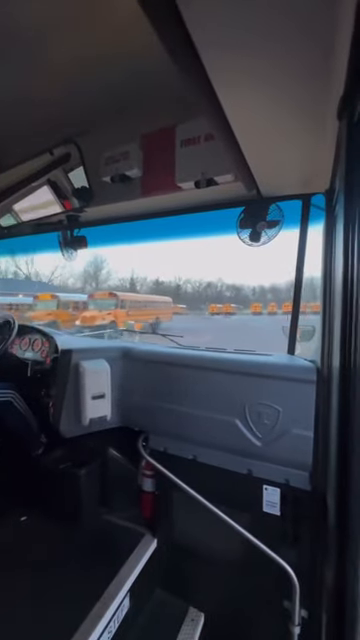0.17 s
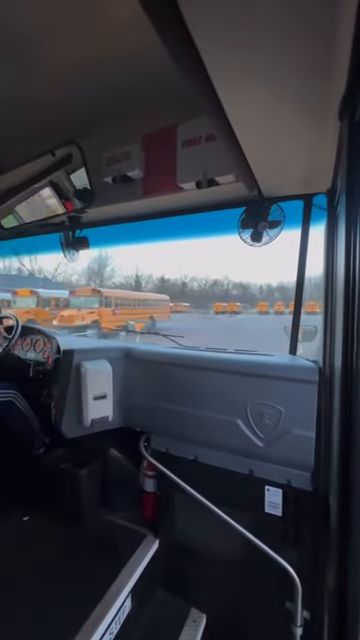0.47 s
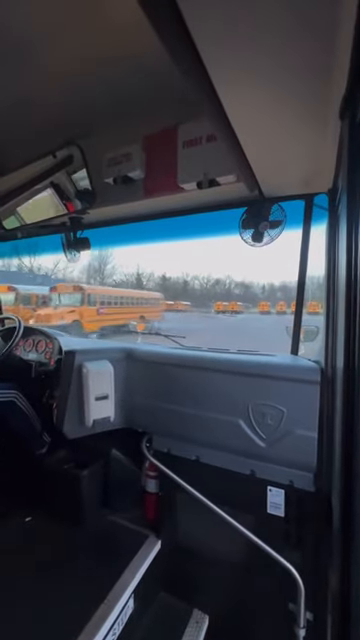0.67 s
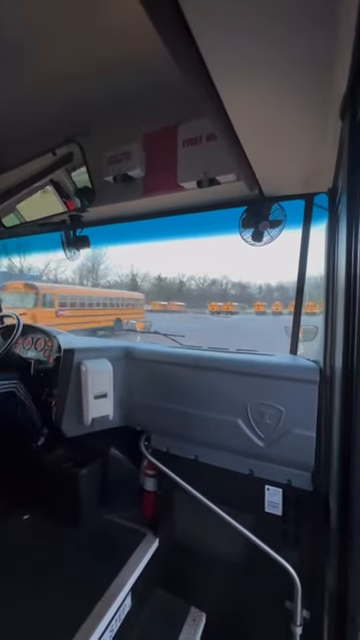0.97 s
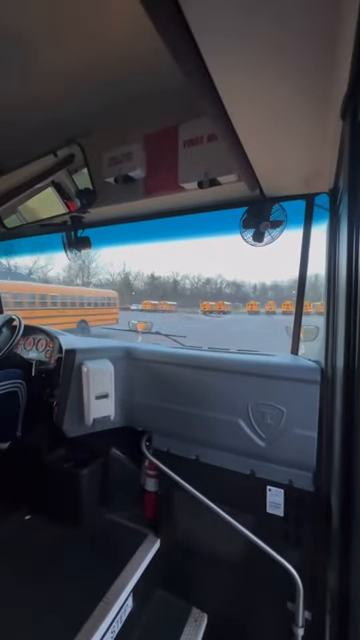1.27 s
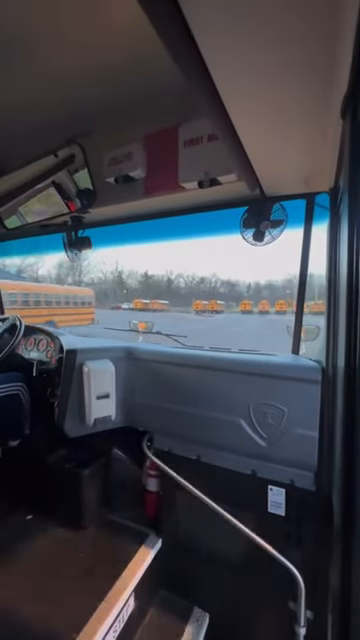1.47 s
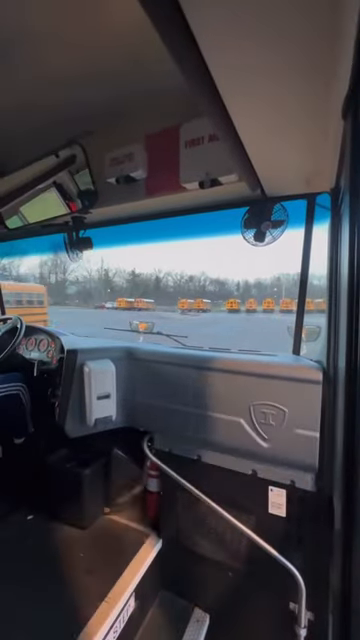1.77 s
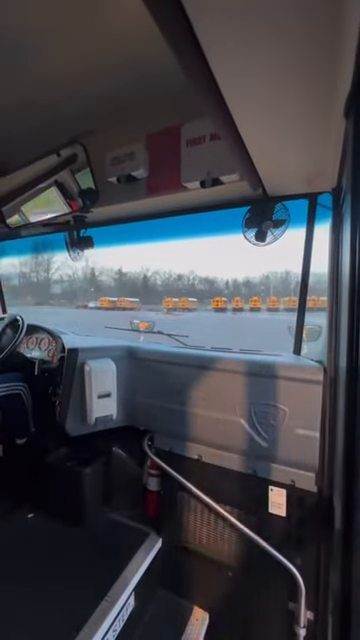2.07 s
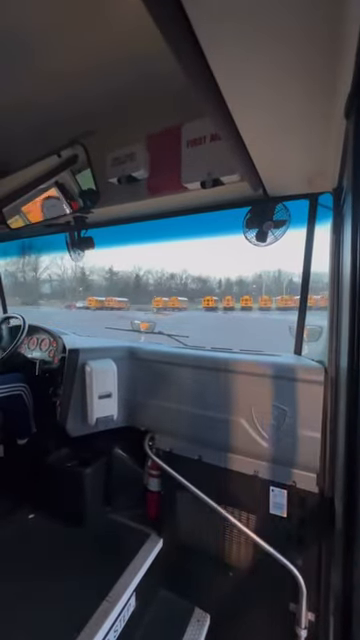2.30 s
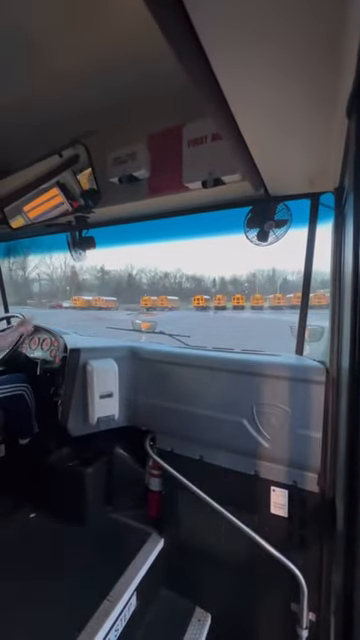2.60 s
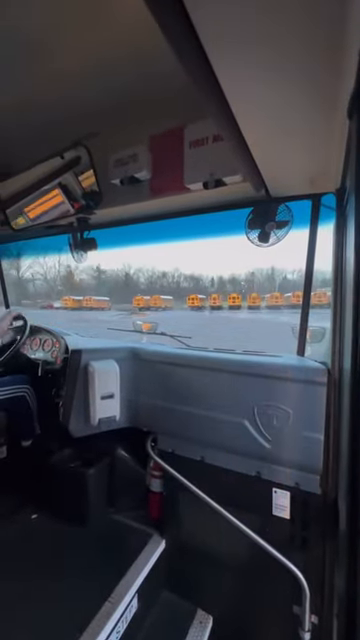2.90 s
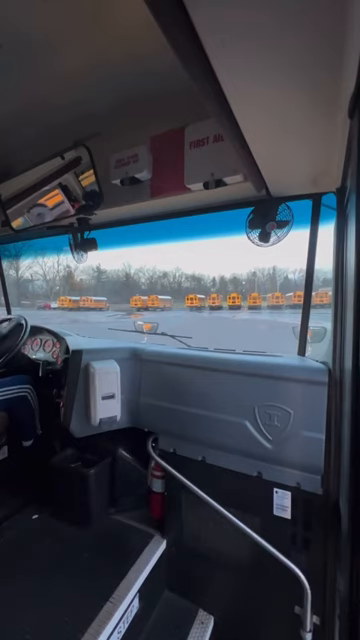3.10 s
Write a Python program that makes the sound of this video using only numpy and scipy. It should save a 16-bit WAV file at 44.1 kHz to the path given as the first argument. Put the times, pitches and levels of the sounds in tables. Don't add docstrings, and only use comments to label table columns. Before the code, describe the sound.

Inside a rolling empty bus, a diesel engine growls under load with a faint high whistle, then eases off; a breathy sigh, metallic clack and air hiss follow, then low coasting rumble and rattles, captured close in stereo.

```python
import sys
import numpy as np
from scipy import signal
from scipy.fft import rfft, irfft
from scipy.io import wavfile

SR = 44100
rng = np.random.default_rng(int(sys.argv[2]) if len(sys.argv) > 2 else 0)


def unload_wav(signal):
    wavfile.write(
        sys.argv[1],
        SR,
        np.round(np.clip(np.atleast_2d(signal).T, -1, 1) * 32767).astype(np.int16),
    )


def attenuation_scalar(level_db):
    decades = np.asarray(level_db, float) / 20
    return 10 ** decades


N = 143325

# freq_hz, density_db_per_hz
CABIN_SPECTRUM = [(150, -2.5), (320, -17.5), (700, -19), (950, -20), (1300, -31), (3500, -38),
                  (8000, -44.5), (12000, -53.5), (15800, -56)]
# time_s, level_db
ROLL_LEVEL = [(0, -34.5), (.15, -14), (.42, -31), (1.2, -27.5), (1.8, -36), (2.3, -34.5), (2.7, -29.5),
              (2.95, -23), (3.25, -33.5)]
# freq_hz, density_db_per_hz
RUMBLE_SPECTRUM = [(20, -1), (35, -0.5), (65, 5), (95, 1.5), (120, 2.5), (215, -14.5), (300, -16),
                   (420, -18)]
# freq_hz, width_hz, level_db, share_of_load_swing
PANEL_MODES = [(301.2, 24, -39.5, 0.27), (521.6, 54, -45.5, 0.33), (952, 66, -46.5, 0.22),
               (1975, 63, -60, 0.74)]
# start_s, level_db, lowest_hz, t60_s
FITTING_TICKS = [(0.082, -34, 1920, 0.36), (.095, -38.5, 6000, 0.099), (0.159, -29.5, 1930, 0.33),
                 (0.319, -39.5, 3000, 0.12), (.86, -39.5, 3000, .15), (1.698, -44.5, 5000, 0.1),
                 (1.717, -35, 1527, 0.11), (1.951, -57, 6000, 0.048), (2.17, -43.5, 6590, 0.089),
                 (1.817, -58, 8000, 0.028), (2.038, -59, 7994, .03), (2.312, -60, 8100, .03),
                 (2.726, -54, 6000, 0.04003), (2.8014, -54.5, 6000, .04), (3.116, -42, 500, .04),
                 (3.173, -45, 800, .03), (3.213, -44, 2000, .04), (3.042, -50, 5042, 0.049),
                 (2.66, -37.5, 603, 0.17), (2.2, -44, 1000, 0.22), (2.728, -45, 1500, .08),
                 (3.07, -43, 1200, 0.22), (3.195, -41, 1400, .07), (3.194, -30.5, 492, .08),
                 (3.204, -40, 1300, 0.062), (3.215, -26.5, 295.7, 0.068)]
# time_s, pitch_hz, level_db
DRIVELINE_BOOM = [
    (1.08, 76.1, -44),
    (1.13, 76.36, -17.5),
    (1.33, 75.65, -17),
    (1.42, 73.56, -30.5),
    (1.55, 73.1, -23.5),
    (1.9, 72.1, -16),
    (2.1, 73.8, -25),
    (2.25, 73.4, -27.5),
    (2.45, 73.7, -46),
]
# start_s, length_s, start_hz, end_hz, level_db
GLIDING_WHINES = [(2.72, 0.449, 765, 705, -44), (2.3, 0.93, 950, 975, -50.5), (2.45, 0.513, 170, 152, -31.5),
                  (3.15, 0.12, 8300, 8350, -55), (1.69, .35, 147, 144, -32), (2.94, .09, 4550, 4530, -56),
                  (2.1, 0.257, 540, 620, -51), (2.75, 0.33, 115, 105, -28), (3.05, .25, 440, 700, -41.5),
                  (.75, .3, 172, 178, -26), (0.026, 0.5, 95, 120, -28)]
# time_s, pitch_hz
TURBO_PITCH = [
    (0.0, 13070),
    (0.978, 12400),
    (1.04, 12238),
]
# time_s, centre_hz, level_db
BOOST_SIGH = [
    (1.0, 4900, -43),
    (1.018, 4780, -35.5),
    (1.06, 4610, -31),
    (1.1, 4000, -33),
    (1.15, 4170, -33),
    (1.2, 4620, -33.5),
    (1.23, 4560, -43),
]
# freq_hz, level_db, t60_s
CLACK_MODES = [(687, -7.5, 0.043), (907, -15.5, 0.036), (1740, -11, 0.024), (2480, -15.5, 0.04),
               (2810, -7.5, 0.018), (3100, -2, 0.012), (3800, -5, 0.0061), (5000, -7, 0.0039),
               (6340, -2, 0.0022), (9600, -4, 0.0048), (12800, -8, 0.004), (15400, -17, .005)]
# freq_hz, density_db_per_hz
VENT_SPECTRUM = [(700, -1.5), (1000, -11.5), (3000, -10), (5000, -6.5), (7500, -7.5), (10000, -9),
                 (15500, -20.5)]
# freq_hz, width_hz, level_db
JET_WHISTLES = [(7740, 84, -15.5), (6400, 55, -18.5), (7080, 36, -28), (5500, 37, -26), (7420, 46, -31),
                (8000, 120, -26), (8500, 65, -24), (5120, 70, -27)]
# time_s, firing_hz, load_db, combustion_tone_db
ENGINE_STATE = [(0, 57.78, 7, -20.5), (.25, 57.86, 4, -22), (.9, 58.55, 2.5, -21.5), (1.02, 59.1, -1, -24),
                (1.14, 58.6, -6, -33), (1.45, 57, -19.5, -55), (1.8, 53.46, -38, -41),
                (2.1, 52.23, -14, -43), (2.4, 59.16, -25, -35), (2.7, 59.9, -11, -34.5),
                (3, 59.15, -19, -32.5), (3.25, 57.38, -4, -26.5)]
# multiple_of_crank_cycle, level_db
CRANK_ORDERS = [(1, -25), (2, -27), (3, -7.5), (4, -5.5), (5, -4.5), (6, 2), (7, -17.5), (8, -12.5),
                (9, -13), (10, -12.5), (11, -11.5), (12, -2), (13, -16), (14, -14.5), (15, -12),
                (16, -19),
                (22, -17.5), (24, -18), (30, -26), (36, -25.5), (39, -16.5), (42, -21.5), (45, -25),
                     (72, -28.5)]
# freq_hz, density_db_per_hz
KNOCK_SPECTRUM = [(150, -9), (300, -13), (650, -19), (800, -16.5), (1300, -26.5), (3000, -31.5),
                  (8000, -39.5), (12500, -47.5)]
# freq_hz, left_right_likeness
STEREO_LIKENESS = [(40, 0.96), (150, 1), (300, 0.99), (600, 0.71), (1200, 0.93), (2500, 1), (5000, 0.18),
                   (10000, 0.8)]
# freq_hz, left_minus_right_db
PORT_LEAN = [(40, 0.5), (90, 2.5), (300, -0.1), (15000, 0)]
# freq_hz, left_lead_rad
PORT_LEAD = [(30, -0.064), (700, -0.26), (1600, 0.2), (2500, -0.96), (4050, -1.49), (5250, -2),
             (7400, -0.45), (8800, -1.53), (15800, -1.55)]
# freq_hz, gain_db
MIC_RESPONSE = [(3500, 0), (5200, 0.5), (7700, 4), (10600, -1), (11400, -7.5), (16000, -3)]

TIME_S = np.arange(N) / SR


def rms_one(x):
    return x / np.sqrt(np.mean(x ** 2) + 1e-20)


def in_time(rows):
    time_s, *columns = np.transpose(rows)
    return [np.interp(TIME_S, time_s, column) for column in columns]


def at_hz(points, hz):
    freq_hz, value = np.transpose(points)
    return np.interp(np.log(hz), np.log(freq_hz), value)


def drift(rate_hz):
    pole = np.exp(-80 * np.pi * rate_hz / SR)
    white = rng.standard_normal(N // 40 + 2002)
    slow = signal.lfilter([1], [1, -2 * pole, pole * pole], white)[2000:]
    return np.interp(np.arange(N) / 40, np.arange(len(slow)), rms_one(slow))


def tone(hz):
    cycles = np.cumsum(hz * np.ones(N)) / SR + rng.random()
    return np.sqrt(2) * np.sin(2 * np.pi * cycles)


def bandpass(order, low_hz, high_hz, x):
    return signal.sosfilt(signal.butter(order, [low_hz, high_hz], "band", fs=SR, output="sos"), x)


def lowpass(order, top_hz, x):
    return signal.sosfilt(signal.butter(order, top_hz, fs=SR, output="sos"), x)


def narrow(hz, width_hz):
    slow = lowpass(2, width_hz / 2, rng.standard_normal((3, 2, N)))
    phase_rad = 2 * np.pi * np.cumsum(hz * np.ones(N)) / SR
    bands = slow[:, 0] * np.sin(phase_rad) + slow[:, 1] * np.cos(phase_rad)
    return rms_one(bands[0] + .7 * bands[1:])


def banded(spectrum, patchy_db):
    low_hz, high_hz = spectrum[0][0], spectrum[-1][0]
    edges_hz = np.geomspace(low_hz, high_hz, int(2.5 * np.log2(high_hz / low_hz)))
    together = drift(5)
    white = rng.standard_normal((2, 2, N + 8000))
    out = 0
    for k, (low, high) in enumerate(zip(edges_hz, edges_hz[1:])):
        mid, side = bandpass(2, low, high, white[k % 2])[:, 8000:]
        centre_hz = np.sqrt(low * high)
        alike = np.clip(at_hz(STEREO_LIKENESS, centre_hz), 0, 1)
        flicker_db = patchy_db * (.5 * together + drift(11.0))
        stereo = np.sqrt(1 + alike) * mid + np.sqrt(1 - alike) * side * [[1], [-1]]
        out = out + attenuation_scalar(at_hz(spectrum, centre_hz) + flicker_db) * stereo
    return rms_one(out)


def cabin_air():
    return attenuation_scalar(-32) * banded(CABIN_SPECTRUM, patchy_db=1.76)


def tyres():
    roll_db, = in_time(ROLL_LEVEL)
    level_db = -24 + 0.51 * (roll_db - roll_db.mean())
    return attenuation_scalar(level_db) * banded(RUMBLE_SPECTRUM, patchy_db=1)


def panels():
    load_db = in_time(ENGINE_STATE)[1]
    out = 0
    for hz, width_hz, db, load_share in PANEL_MODES:
        level_db = db + load_share * (load_db + 15.5) + 2 * drift(18)
        out = out + attenuation_scalar(level_db) * narrow(hz, width_hz)[[0, 0]]
    return out


def fittings():
    snap_db, snap_t60_s = -6, 0.013
    ring_hz, ring_db = 7900, 2
    out = np.zeros((2, N + SR))
    age_s = np.arange(SR // 4) / SR
    for start_s, db, low_hz, t60_s in FITTING_TICKS:
        white = rng.standard_normal((3, len(age_s)))
        decay = attenuation_scalar(-60 * age_s / t60_s) + attenuation_scalar(snap_db - 60 * age_s / snap_t60_s)
        grit = (white[0] + .6 * white[1:]) * decay
        body = bandpass(2, low_hz, min(3.45 * low_hz, 16000), grit)
        ring = bandpass(1, .95 * ring_hz, 1.05 * ring_hz, grit)
        burst = body / np.std(body[:, :200]) + attenuation_scalar(ring_db) * ring * low_hz / 2000
        first = int(start_s * SR)
        out[:, first:first + len(age_s)] += attenuation_scalar(db) * burst
    return out[:, :N]


def driveline():
    third_db, third_follows = -35.5, 0.21
    hz, db = in_time(DRIVELINE_BOOM)
    start_s, end_s = DRIVELINE_BOOM[0][0], DRIVELINE_BOOM[-1][0]
    fade = np.clip(np.minimum(TIME_S - start_s, end_s - TIME_S) / 0.042, 0, 1)
    boom = attenuation_scalar(db + 1.35 * drift(9.8)) * tone(hz)
    third_level_db = third_db + third_follows * (db + 26.5) + 2.5 * drift(2.9)
    return fade * (boom + attenuation_scalar(third_level_db) * tone(3 * hz))


def gliding_whines():
    out = np.zeros(N)
    for start_s, length_s, start_hz, end_hz, db in GLIDING_WHINES:
        along = np.clip((TIME_S - start_s) / length_s, 0, 1)
        swell = np.sqrt(np.sin(np.pi * along).clip(0))
        hz = start_hz + (end_hz - start_hz) * along
        out += attenuation_scalar(db + 2 * drift(4.2)) * swell * tone(hz)
    return out


def turbo_whistle():
    hz, = in_time(TURBO_PITCH)
    fade = np.clip((1.08 - TIME_S) / 0.051, 0, 1)
    return attenuation_scalar(-49) * (narrow(hz, width_hz=160) + .5 * tone(hz)) * fade


def boost_sigh():
    width_hz, waver_hz, flutter_db = 1050, 90, 1.2
    upper_ratio, upper_db, upper_fade_s, upper_fall_db_per_s = 1.87, -11.5, 1.135, 280
    hz, db = in_time(BOOST_SIGH)
    on = (TIME_S > BOOST_SIGH[0][0]) & (TIME_S < BOOST_SIGH[-1][0])
    upper_hz = upper_ratio * (hz + hz.mean()) / 2
    upper_level_db = upper_db - upper_fall_db_per_s * np.clip(TIME_S - upper_fade_s, 0, 1)
    upper = attenuation_scalar(upper_level_db) * narrow(upper_hz, width_hz)
    air = attenuation_scalar(-10) * narrow(7000, width_hz=8000)
    level = attenuation_scalar(db + flutter_db * drift(40))
    return on * level * (narrow(hz + waver_hz * drift(30.5), width_hz) + upper + air)


def valve_clack():
    clack_s, echo_s = 1.1286, 0.00147
    crack_db, crack_t60_s = -7.5, .02
    clack = np.zeros((2, N))
    for k, (hz, db, t60_s) in enumerate(CLACK_MODES):
        hits = np.full((2, N), 1e-18)
        hits[:, int((clack_s + 1 / hz) * SR)] = attenuation_scalar(db + rng.normal(0, 1, 2)) * (-1) ** k
        hits[:, int((clack_s + echo_s + 1 / hz) * SR)] = attenuation_scalar(db - 6) * rng.choice([-1, 1], 2)
        pole, turn_rad = attenuation_scalar(-60 / (t60_s * SR)), 2 * np.pi * hz / SR
        resonator = [1, -2 * pole * np.cos(turn_rad), pole * pole]
        clack += signal.lfilter([0, np.sin(turn_rad)], resonator, hits)
    age_s = TIME_S - clack_s
    crack_level = (age_s > 0) * attenuation_scalar(crack_db - 60 * age_s.clip(0, 1) / crack_t60_s)
    clack += crack_level * narrow(3000, width_hz=4000)
    return attenuation_scalar(-10) * clack


def air_vent():
    vent_s, attack_s, lag_s, hold_s = 1.202, .003, .0075, .045
    fall_db_per_s, tail_db, tail_db_per_s = 108, -13, 57
    age_s = TIME_S - vent_s
    after_s = np.clip(age_s - hold_s, 0, None)
    pressure = attenuation_scalar(-fall_db_per_s * after_s) + attenuation_scalar(tail_db - tail_db_per_s * after_s)
    flutter = attenuation_scalar(1.3 * drift(55))
    opening = np.clip(age_s / attack_s, 0, 1)
    open_wide = np.clip((age_s - lag_s) / attack_s, 0, 1)
    jet = (.2 * opening + 0.74 * open_wide) * banded(VENT_SPECTRUM, patchy_db=-0.5)
    whistles = sum(attenuation_scalar(db + 2 * drift(11)) * narrow(hz, width_hz) for hz, width_hz, db in JET_WHISTLES)
    return attenuation_scalar(-22) * flutter * pressure * (jet + opening * whistles)


def crank_orders(firing_hz, load_db):
    out = 0
    for k, db in CRANK_ORDERS:
        wobble_db = 3.5 if k % 6 or k > 12 else 1.4
        tilt_db = .25 * load_db * np.log2(k / 6)
        level_db = db + tilt_db + wobble_db * drift(4 * np.sqrt(k / 6))
        out = out + attenuation_scalar(level_db) * tone(k * firing_hz / 3)
    return out


def combustion_knock(firing_hz, load_db):
    depth, sharpness = 0.42, 0.89
    firings = np.cumsum(firing_hz) / SR
    strength = attenuation_scalar(rng.normal(0, 2.0, int(firings[-1]) + 1))[firings.astype(int)]
    gate = 1 - depth + depth * sharpness * strength * np.exp(-sharpness * (firings % 1))
    noise = lowpass(6, 12900, banded(KNOCK_SPECTRUM, patchy_db=1.5))
    return attenuation_scalar(-28 + 1.065 * load_db) * gate * noise


def gear_and_pump(firing_hz):
    beat_s, beat_peak_s = .41, 1.37
    beat = 1 + 0.5 * np.cos(2 * np.pi * (TIME_S - beat_peak_s) / beat_s)
    gear = attenuation_scalar(-44) * beat * attenuation_scalar(4.0 * drift(13)) * tone(10 * firing_hz)
    sag_hz = 26.06 * np.clip((TIME_S - 1.25) / 0.151, 0, 1)
    pump = attenuation_scalar(-46.5 + 3.8 * drift(11.07)) * tone(899 - sag_hz + 3 * drift(3.24))
    return np.clip((2.06 - TIME_S) / 0.2, 0, 1) * (gear + pump)


def engine():
    firing_hz, load_db, tone_db = in_time(ENGINE_STATE)
    firing_hz = firing_hz * (1 + .004 * drift(10.4))
    orders = attenuation_scalar(tone_db) * crank_orders(firing_hz, load_db)
    return orders + combustion_knock(firing_hz, load_db) + gear_and_pump(firing_hz)


def scene():
    power = engine() + turbo_whistle() + boost_sigh()
    running_gear = driveline() + gliding_whines()
    air_valve = air_vent() + valve_clack()
    background = fittings() + panels() + tyres() + cabin_air()
    return power + running_gear + air_valve + background


def low_pass(x):
    return signal.sosfilt(signal.butter(12, 15910, fs=SR, output="sos"), x)


def record(dry):
    hz = np.maximum(np.fft.rfftfreq(2 * N, 1 / SR), 1)
    lean = attenuation_scalar(at_hz(PORT_LEAN, hz) / 2)
    left = lean * np.exp(1j * at_hz(PORT_LEAD, hz))
    right = 1 / lean
    ports = attenuation_scalar(at_hz(MIC_RESPONSE, hz)) * [left, right] * (hz < 15910)
    mix = irfft(rfft(dry, 2 * N) * ports)[:, :N]
    return low_pass(mix)


dry = scene()
out = record(dry)
unload_wav(out)
```